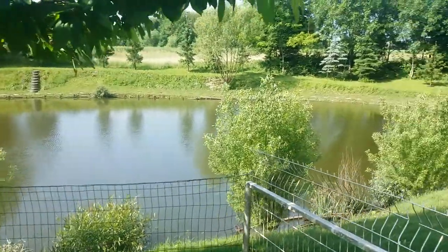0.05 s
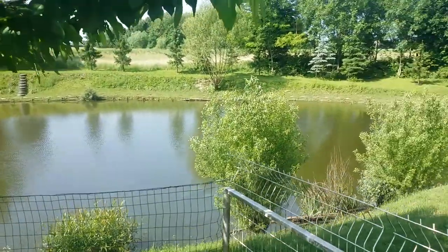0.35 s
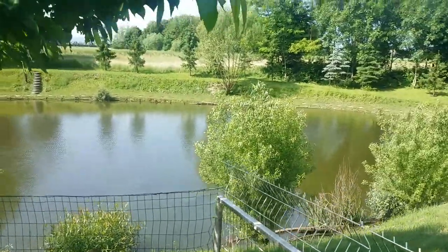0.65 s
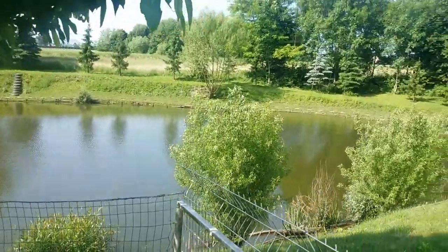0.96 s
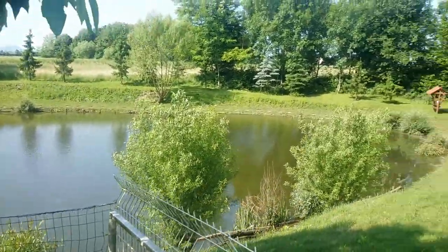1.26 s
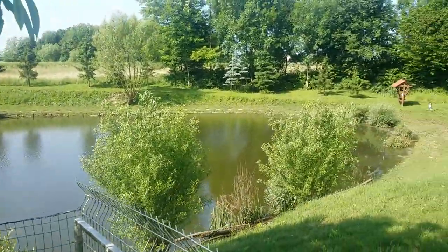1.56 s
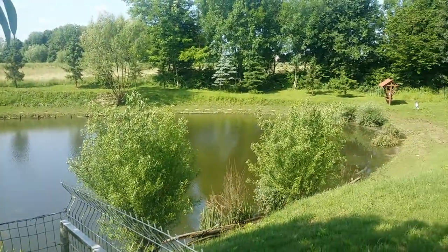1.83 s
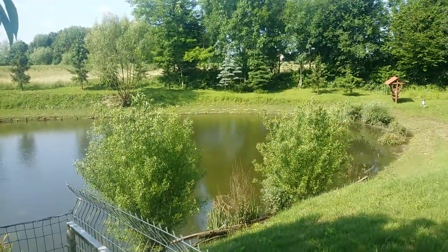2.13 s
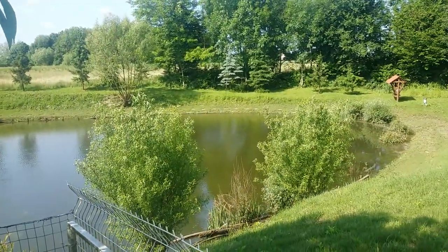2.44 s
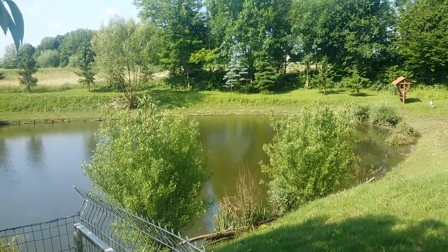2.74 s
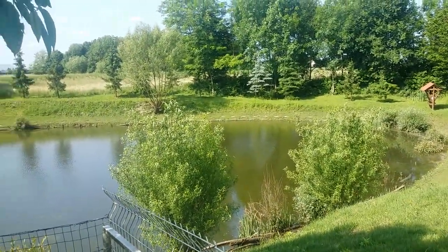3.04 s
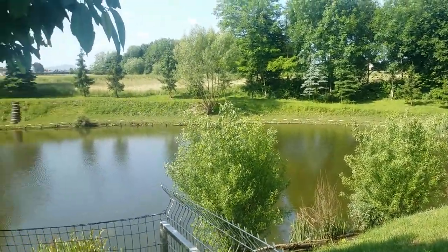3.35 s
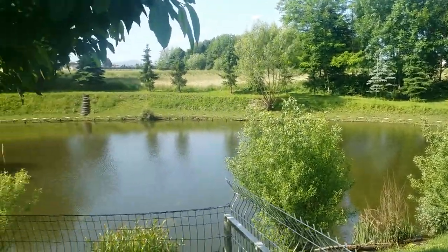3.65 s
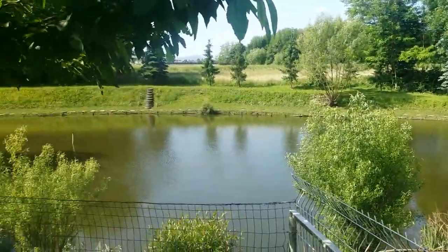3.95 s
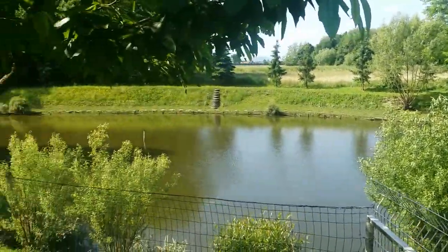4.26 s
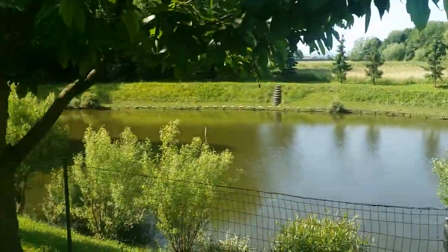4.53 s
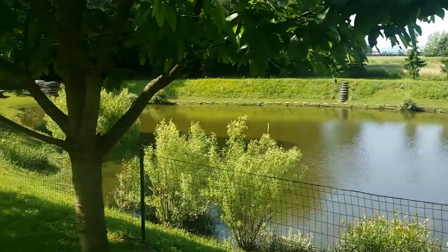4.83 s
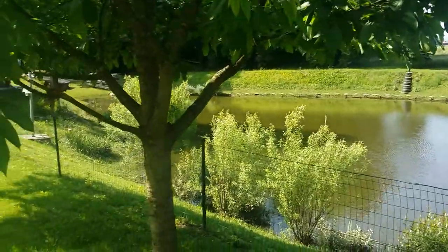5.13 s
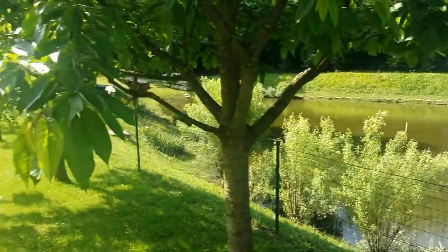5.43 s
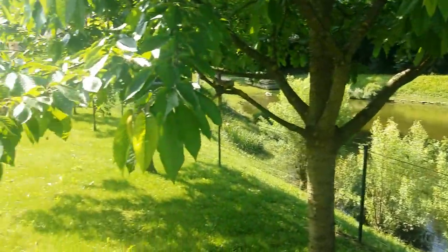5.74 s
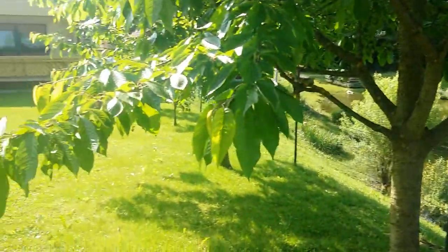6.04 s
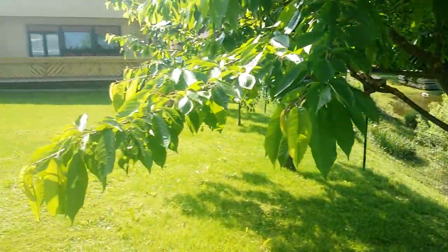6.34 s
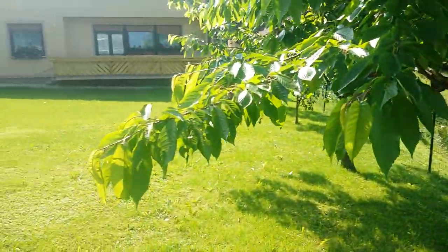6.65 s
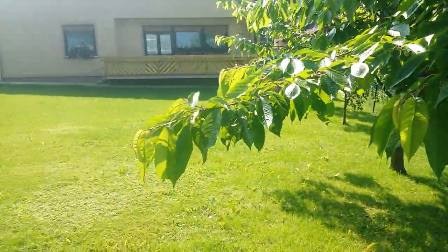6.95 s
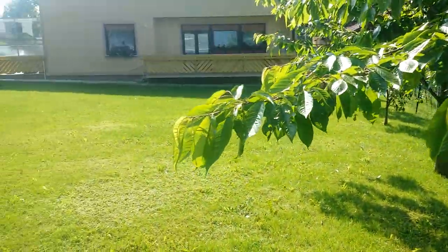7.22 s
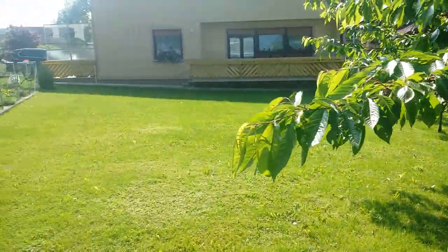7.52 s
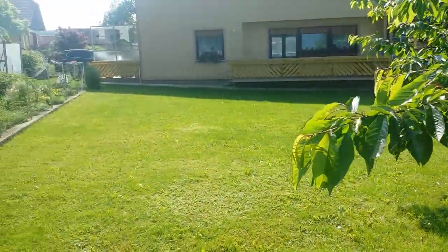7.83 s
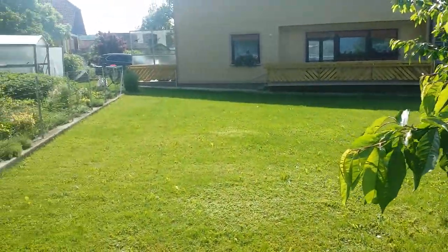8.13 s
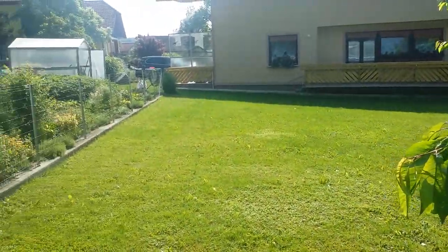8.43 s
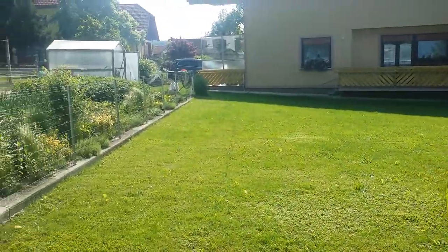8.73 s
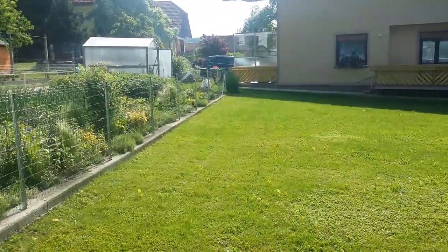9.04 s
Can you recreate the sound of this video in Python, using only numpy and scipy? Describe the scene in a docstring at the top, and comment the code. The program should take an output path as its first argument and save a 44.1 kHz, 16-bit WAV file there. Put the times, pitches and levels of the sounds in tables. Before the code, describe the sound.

A soft outdoor hiss and distant birds fill a garden. A nearer small bird sings a run of high, raspy chirps, swelling into one clear warbled whistle repeated four times, with a slight echo from the trees. The hand-held microphone gives a sharp click with a short low thump. Far birds keep calling quietly, while short wind rumbles hit the microphone and a gentle rustle closes the scene.

```python
"""A garden by a pond: a soft outdoor hush and far-off birds, every note scattered by the foliage.
At 1 s a small songbird starts a scratchy twitter that swells into four loud fluted whistles (3.6-4.5 s).
Low puffs of wind catch the hand-held microphone, which gives one sharp click as the song ends.
Other birds call on from farther off, with a light tick at 6.5 s;
near 9 s a soft rustle sets in with the last puffs."""
import sys
import numpy as np
from scipy import signal
from scipy.fft import rfft, irfft
from scipy.io import wavfile
from scipy.ndimage import uniform_filter1d

SR = 44100
rng = np.random.default_rng(int(sys.argv[2]) if len(sys.argv) > 2 else 0)


def wav_out(sig):
    """Save sig, one row per channel (or a flat mono array), as 16-bit PCM at SR to the path in sys.argv[1]."""
    wavfile.write(sys.argv[1], SR, np.round(np.clip(np.atleast_2d(sig).T, -1, 1) * 32767).astype(np.int16))


N = 404838
TIME = np.arange(N) / SR


def twitter(scratch_rasp=0.67):
    """The singer's opening run: clear bent notes alternate with scratchy slides."""
    # clear notes: (time [s], length [s], start [Hz], middle [Hz], end [Hz],
    #               level [dB], crescendo [dB], rasp [0-1])
    notes = [ (1.086, 0.031, 2440, 2390, 2440, -64.5, -2, .1), (1.145, .028, 4770, 4630, 4450, -60, 4, .02),
             (1.166, .032, 4480, 4356, 4180, -44, -1, 0.01), (1.27, .018, 2770, 2880, 2980, -60, 0, 0),
             (1.289, 0.038, 2610, 2915, 3090, -49.5, 2, 0), (1.516, 0.021, 4850, 4990, 4890, -49, 2, 0.1),
             (1.589, 0.039, 1720, 1877, 1810, -64, 0, 0.1), (1.711, 0.021, 3020, 2880, 2300, -48, -6, 0.07),
             (1.741, 0.042, 2790, 2777, 2975, -46.5, 2, 0.06),
             (1.938, 0.036, 3540, 3640, 3640, -54, 2, 0.1), (1.962, 0.054, 3710, 3980, 4580, -44, 10, 0.21),
             (2.324, 0.022, 3200, 3360, 3480, -48.5, -2, 0.26),
             (2.354, 0.036, 2740, 2767, 3050, -44, -1, 0.25), (2.811, 0.05, 2490, 2650, 2860, -45, 19, .24),
             (2.916, 0.046, 2486, 2204, 2640, -53, -3, 0.3),
             (2.962, 0.021, 2620, 2940, 3130, -37.5, 3, 0.06),
             (3.045, .068, 3463, 3387, 3363, -35, 17, 0.03), (3.192, 0.02, 4450, 4550, 4450, -44, 10, .05),
             (3.209, 0.033, 3930, 3788, 4100, -34.5, -1, 0.08),
             (3.245, 0.038, 4264, 4397, 4400, -35, -13.5, 0), (3.358, 0.07, 2894, 3307, 3490, -35, 5, .03),
             (3.398, 0.062, 3900, 4350, 4420, -49.5, -5, 0.02),
             (3.466, .036, 3536, 3570, 3670, -39, 5, 0.08)]
    # scratchy slides: (time [s], length [s], start [Hz], end [Hz], level [dB])
    slides = [ (1.384, 0.027, 5900, 7500, -59), (1.385, .036, 3370, 4760, -55.5),
              (1.508, 0.032, 3910, 4680, -51.5), (2.05, .029, 6550, 6300, -57.5),
              (2.055, 0.035, 4840, 3380, -48), (2.127, 0.021, 6350, 6060, -56.5),
              (2.13, 0.03, 4600, 3290, -49), (2.200, 0.015, 3500, 2600, -58),
              (2.228, 0.049, 6480, 5180, -45.5), (2.442, 0.021, 2554, 3040, -54.5),
              (2.493, .039, 5110, 3910, -52), (2.557, 0.017, 3010, 2550, -58),
              (2.627, 0.065, 3990, 4080, -54.5), (2.630, 0.043, 7660, 8000, -53.5),
              (2.658, 0.038, 6920, 6390, -41), (2.687, 0.032, 2996, 2760, -55.5),
              (2.693, .026, 5850, 5630, -43), (2.913, .03, 5100, 4380, -60.5),
              (2.96, 0.0216, 5600, 4400, -59), (3.315, 0.02, 5800, 4800, -56),
              (3.490, .02, 5830, 4670, -54), (3.57, .022, 7700, 6640, -54.5),
              (4.054, .025, 2890, 2310, -55.5)]
    clear = place((s, chirp(length, hz, db, rasp, rise)) for s, length, *hz, db, rise, rasp in notes)
    scratchy = place((s, chirp(length, hz, db, scratch_rasp)) for s, length, *hz, db in slides)
    return clear + scratchy


def whistles():
    """The song ends on one fluted warble, sung four times."""
    # warbles: (time [s], length [s], level [dB], low note [Hz], dip before the low note [dB])
    warbles = [(3.573, .137, -33, 2670, -1.5), (3.831, .14, -34.3, 2746, -16),
               (4.062, .16, -35.5, 2686, -11), (4.338, 0.15, -39, 2740, -17)]
    return place((s, warble(*row)) for s, *row in warbles)


def warble(length, db, low_hz, catch_db, flutter_db=1.4, quaver_hz=30, catch_at=0.588, catch_width=0.035):
    """A quavering whistle that arches up, catches as it drops to its low note, then lifts."""
    # contour: (position [share of length], pitch before the low note is tuned [Hz], relative level [dB])
    contour = [(0, 3384, -4.5), (.11, 3302, 0.5), (.24, 3410, 3), (.38, 3770, -4.5), (.5, 3730, 1),
               (.6, 2938, -3), (.72, 2720, -5.5), (.86, 2882, -2.5), (1, 3135, -11)]
    t = np.arange(int(length * SR)) / SR
    progress = t / length
    hz, shape_db = along(contour, progress)
    hz = np.where(progress > catch_at, hz * low_hz / hz.min(), hz)
    shape_db += catch_db * np.exp(-((progress - catch_at) / catch_width) ** 2)
    glide = uniform_filter1d(hz, size=400, mode="nearest") + quaver_hz * wander(t, 92)
    envelope = signal.windows.tukey(len(t), .08) * from_db(db + shape_db + flutter_db * wander(t, 159))
    return envelope * syrinx(t, glide, rasp=0.034)


def chirp(length, pitches_hz, db, rasp, crescendo_db=0, softness=0.26):
    """One swell of air while the pitch bends through two or three points."""
    t = np.arange(max(int(length * SR), 64)) / SR
    progress = t / t[-1]
    bend = np.polyfit(np.linspace(0, 1, len(pitches_hz)), pitches_hz, len(pitches_hz) - 1)
    swell = rms_one(np.abs(np.sin(np.pi * progress)) ** softness * from_db(crescendo_db * progress))
    return from_db(db) * swell * syrinx(t, np.polyval(bend, progress), np.clip(rasp, 0, 1))


def syrinx(t, hz, rasp, buzz_hz=640, swing_hz=430, jitter_hz=330, throb=0.99, overtone_db=-36):
    """A bird's nearly pure tone; in raspy notes a fast uneven buzz shakes its pitch and strength."""
    buzz = np.sin(2 * np.pi * np.cumsum(buzz_hz * (1 + 0.134 * wander(t, 199.5))) / SR)
    shaken_hz = hz + rasp * (swing_hz * buzz + jitter_hz * wander(t, 1093))
    phase = 2 * np.pi * np.cumsum(shaken_hz) / SR
    strength = 1 + throb * rasp * (buzz + wander(t, 358))
    return rms_one(strength * (np.sin(phase) + from_db(overtone_db) * np.sin(2 * phase)))


def calls(whit_s=0.017, whit_hz=(3230, 3970, 5550), chek_s=0.0216, chek_hz=(3464, 3130, 2720), pip_s=0.019):
    """Birds in neighbouring trees repeat three short calls."""
    # a rising "whit": (time [s], level [dB])
    whits = [(1.224, -63), (3.618, -50), (4.955, -65.5), (5.057, -73), (6.525, -63.5), (6.676, -66),
             (6.870, -70), (7.398, -70)]
    # a dry falling "chek": (time [s], level [dB])
    cheks = [(1.060, -57), (8.822, -65.5), (8.932, -63.5), (9.056, -58), (9.158, -64)]
    # thin, level pips: (time [s], pitch [Hz], level [dB])
    pips = [(.165, 7700, -68), (3.985, 6550, -59), (4.650, 7350, -61), (4.760, 7390, -64.5),
            (5.058, 7280, -62.5), (5.058, 6070, -66), (5.300, 6350, -63), (5.300, 7900, -66),
            (6.600, 5950, -68), (9.066, 4830, -57)]
    rising = place((s, chirp(whit_s, whit_hz, db, rasp=0.14)) for s, db in whits)
    falling = place((s, chirp(chek_s, chek_hz, db, rasp=0.51)) for s, db in cheks)
    thin = place((s, chirp(pip_s, (hz, hz), db, rasp=0.09)) for s, hz, db in pips)
    return rising + falling + thin


def far_song():
    """Slow, soft fluting from across the garden."""
    # notes: (time [s], length [s], start [Hz], middle [Hz], end [Hz], level [dB], rasp [0-1])
    notes = [ (0.283, .027, 4300, 4850, 5350, -66.5, .55), (0.44, 0.082, 3390, 3580, 3540, -77.5, 0.2),
             (0.782, .029, 2820, 2670, 2500, -70, .2), (0.803, 0.045, 2150, 2223, 2240, -71, 0.11),
             (0.813, 0.033, 4400, 4550, 4380, -72.5, .06), (0.867, 0.063, 4150, 3550, 3250, -68.5, 0),
             (5.042, .17, 2000, 2320, 2460, -75, 0.16), (5.409, 0.07, 1790, 2000, 2250, -70, 0.12),
             (5.491, .122, 2320, 2520, 2470, -73, .45), (5.568, .047, 2334, 2274, 2280, -68, 0.14),
             (5.70, .05, 2424, 2130, 1880, -69.5, .4), (5.76, 0.034, 1800, 1806, 1790, -70, .03),
             (6.529, .173, 2454, 2293, 2430, -72, 0.49), (6.79, 0.415, 1740, 1802, 1793, -76.5, 0.12),
             (7.166, 0.039, 2290, 2307, 2380, -68.5, 0.63), (7.30, 0.077, 2640, 2664, 2770, -76, 0.23)]
    return place((s, chirp(length, hz, db, rasp)) for s, length, *hz, db, rasp in notes)


def chorus(lowest_hz=2850, range_hz=1900, slide=0.297, shortest_s=0.0142, spread_s=0.0306):
    """Small far chirps come at random from all around, each with its own pitch, slide and length."""
    # chirp loudness: (time [s], level [dB])
    loudness = [(0, -78), (1.1, -79), (2.2, -68), (2.95, -62), (3.4, -64), (4.25, -68), (4.4, -60.5),
                (4.6, -73), (5.0, -81), (7.0, -81), (8.2, -83.5), (9.18, -79.5)]
    slot_s = 0.01
    slots = np.arange(0, N / SR, slot_s)
    levels_db, = along(loudness, slots)
    out = np.zeros(N)
    for s, db, (chance, pitch, tilt, size, rough) in zip(slots, levels_db, rng.random((len(slots), 5))):
        chirps_per_s = 32 * 2 ** ((db + 63) / 9)  # twice as busy for every 9 dB louder
        if chance < slot_s * chirps_per_s:
            hz = lowest_hz + range_hz * pitch ** 2
            bend = 1 + slide * (tilt - .5)
            add(out, s, chirp(shortest_s + spread_s * size, (hz * bend, hz / bend), db, 0.86 * rough))
    return out


def garden(x, scatter_db, leaves_t60_s=0.04, trees_t60_s=0.78, build_s=0.011, turn_hz=0.5924):
    """A few distinct echoes, a quick scatter from nearby leaves and a longer tail from the trees."""
    # echoes from the ground, trunks and house: (delay [s], level [dB])
    echoes = [(.0043, -8.5), (.021, -10.5), (.118, -20)]
    t = TIME[:SR]
    decay = from_db(-60 * t / trees_t60_s) + from_db(-60 * t / leaves_t60_s)
    paths = rng.standard_normal((2, SR)) * decay * np.minimum(t / build_s, 1)
    paths *= from_db(scatter_db) / np.linalg.norm(paths, axis=1, keepdims=True)
    # the microphone turns, so the scatter drifts from one set of paths to another
    first, second = signal.fftconvolve(x[None], paths, axes=1)[:, :N]
    turn = 2 * np.pi * turn_hz * TIME
    out = x + np.cos(turn) * first + np.sin(turn) * second
    for delay, db in echoes:
        add(out, delay, from_db(db) * x)
    return out


def click(at_s=4.5533, step_db=-11, leak_s=0.05, top_hz=9100, low_cut_hz=70):
    """A handling snap is a pressure step; the microphone's steep low cut turns it into a short boom."""
    age = np.maximum(TIME - at_s, 0)
    step = (age > 0) * np.exp(-age / leak_s) + 1e-18
    snap = from_db(step_db) * butter(step, top_hz, "low", order=1)
    return butter(butter(snap, low_cut_hz, "high", order=4), low_cut_hz, "high", order=4)


def wind(eddy_hz=77.6, eddy_db=-59, db_per_octave=44.5, sag_octaves=0.65, unsteady=0.34, ragged_db=3.5):
    """Each puff is an eddy at the microphone port: uneven swings of pressure that build and die away."""
    # puffs: (time [s], rise time [s], peak level [dB])
    puffs = [(.01, 0.062, -63), (3.638, 0.038, -52.5), (4.478, 0.036, -53.5), (4.636, 0.032, -54.5),
             (4.83, 0.055, -61), (5.06, .025, -61), (5.492, 0.072, -56), (5.762, .021, -56),
             (5.907, 0.024, -46.5), (7.174, 0.018, -36.5), (8.937, .03, -35.5), (9.030, 0.038, -38)]
    out = np.zeros(N)
    for s, rise_s, db in puffs:
        t = np.arange(int(4 * rise_s * SR)) / SR
        age = t / rise_s
        # a stronger puff spins faster, and every eddy slows as it passes
        hz = eddy_hz * 2 ** ((db - eddy_db) / db_per_octave - sag_octaves * np.tanh(age - 1))
        turns = rng.random() + np.cumsum(hz * (1 + unsteady * wander(t, 300.5))) / SR
        eddy = rms_one(np.sin(2 * np.pi * turns) * from_db(ragged_db * wander(t, 194)))
        swell = (age * np.exp(1 - age)) ** 2.5
        add(out, s, from_db(db) * eddy * swell)
    return butter(out, 40, "high")


def rustle(at_s=8.925, db=-54.5, attack_s=0.03, fade_db_per_s=7):
    """A broad, soft rustle that starts quickly and lingers."""
    # tone colour: (frequency [Hz], relative level [dB])
    colour = [(240, -36), (400, -1), (471, -4), (1260, -3.5), (2350, -10), (2940, -4), (4200, -7.5),
              (7280, 0), (14000, -21.5)]
    age = np.maximum(TIME - at_s, 0)
    return np.minimum(age / attack_s, 1) * from_db(db - fade_db_per_s * age) * coloured_noise(colour)


def tick(at_s=6.452, db=-60, band_hz=(1100, 2600), t60_s=0.05):
    """One light, dry tick: a midrange burst that dies at once."""
    burst = rms_one(butter(rng.standard_normal(SR), band_hz, "band"))
    return place([(at_s, burst * from_db(db - 60 * TIME[:SR] / t60_s))])


def hush(murmur_trim_db=4, hiss_trim_db=11):
    """Outdoor murmur and hiss, lifted and lowered by the recorder's gain, loudest while the bird sings."""
    # background level, before the trims: (time [s], murmur [dB], hiss [dB])
    levels = [(0.0, -72, -75.5), (0.57, -72, -77), (1.01, -74.5, -77.5), (1.34, -69, -72.5),
              (1.8, -70.5, -74.5), (2.2, -68, -71.5), (2.57, -69, -74.5), (3.53, -65, -67.5),
              (3.71, -65, -70), (4.13, -63.5, -70), (4.43, -65.5, -68.5), (4.82, -72.5, -77.5),
              (7.44, -72.5, -76.5), (7.86, -75, -78.5), (8.38, -75, -78.5), (8.88, -73, -76.5)]
    # dark murmur: (frequency [Hz], relative level [dB])
    murmur_colour = [(24, -57), (40, -2.5), (70, 2.5), (248, -4.5), (311, -0.5), (397, -4.5), (474, -2.5),
                     (522, -5), (794, -7.5), (1100, -8), (1230, -7.5), (1700, -13), (1900, -13),
                     (2470, -14.5), (4180, -120)]
    # bright hiss: (frequency [Hz], relative level [dB])
    hiss_colour = [(880, -71), (1500, -11.5), (2090, -10), (2170, -10), (2500, -6.5), (2890, -6.5),
                   (3590, -6.5), (5200, -6), (5670, -4), (7250, 2), (8520, -4.5), (9190, -8.5),
                   (13800, -16.5), (14500, -19)]
    murmur_db, hiss_db = along(levels, TIME)
    murmur = from_db(murmur_db + murmur_trim_db) * coloured_noise(murmur_colour)
    hiss = from_db(hiss_db + hiss_trim_db) * coloured_noise(hiss_colour)
    return murmur + hiss


def drone(hz=1223, width_hz=66):
    """A faint far-off drone: a narrow band of noise that swells and sinks."""
    # swells: (middle [s], length [s], peak level [dB])
    swells = [(.5, 1.0, -73.5), (2.92, 0.94, -71), (4.17, 0.56, -69.5)]
    band = butter(rng.standard_normal(N), (hz - width_hz / 2, hz + width_hz / 2), "band", order=1)
    level = place((s - length / 2, from_db(db) * np.hanning(int(length * SR))) for s, length, db in swells)
    return level * rms_one(band)


def coloured_noise(spectrum):
    """Noise of rms 1 with the given spectrum, falling steeply beyond its ends."""
    hz, db = np.transpose(spectrum)
    bins = np.maximum(np.arange(N // 2 + 1) * SR / N, 1)
    skirts = np.minimum(bins / hz[0], 1) ** 4 * np.minimum(hz[-1] / bins, 1) ** 4
    colour = from_db(np.interp(np.log(bins), np.log(hz), db))
    return rms_one(irfft(rfft(rng.standard_normal(N)) * skirts * colour, N))


def wander(t, per_s):
    """Random wavering of spread about 1 that changes per_s times a second."""
    knots = rng.standard_normal(4096)
    return np.interp((t - t[0]) * per_s % len(knots), np.arange(len(knots)), knots)


def butter(x, hz, kind, order=2):
    """Causal Butterworth filter."""
    return signal.sosfilt(signal.butter(order, hz, kind, fs=SR, output="sos"), x)


def from_db(db):
    """Decibels to gain."""
    return 10 ** (np.asarray(db) / 20)


def rms_one(x):
    """Scale to rms 1."""
    return x / np.sqrt(np.mean(x ** 2) + 1e-20)


def along(rows, t):
    """Each column of a curve at the times t."""
    s, *columns = np.transpose(rows)
    return [np.interp(t, s, c) for c in columns]


def add(out, s, sound):
    """Mix a sound in at time s."""
    start = int(np.clip(s * SR, 0, N))
    out[start:start + len(sound)] += sound[:N - start]


def place(sounds):
    """Lay (time [s], sound) pairs out on one track."""
    out = np.zeros(N)
    for s, sound in sounds:
        add(out, s, sound)
    return out


def scene():
    """Birds, hush and microphone buffets in mono; the farther a bird, the more of it is scatter."""
    singer = garden(twitter(), scatter_db=-8.5) + garden(whistles(), scatter_db=-12)
    neighbours = garden(calls(), scatter_db=-4)
    far_birds = garden(far_song(), scatter_db=1.5) + garden(chorus(), scatter_db=4.5)
    return (singer + neighbours + far_birds + hush() + drone() + wind() + rustle() + click() + tick())[None]


def record(dry, cutoff_hz=14600):
    """A steep low-pass takes off the very top."""
    return signal.sosfilt(signal.ellip(10, .1, 70, cutoff_hz, fs=SR, output="sos"), dry)


dry = scene()
out = record(dry)
wav_out(out)
```